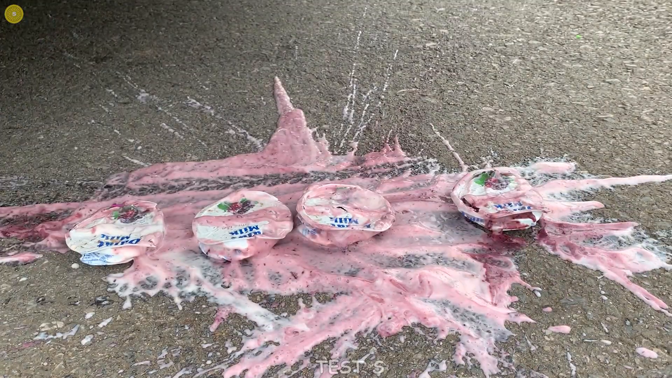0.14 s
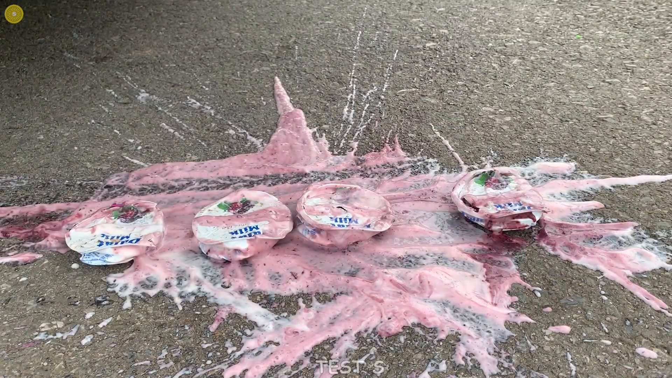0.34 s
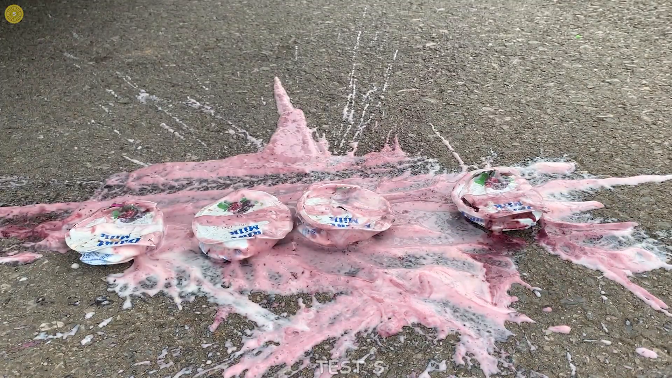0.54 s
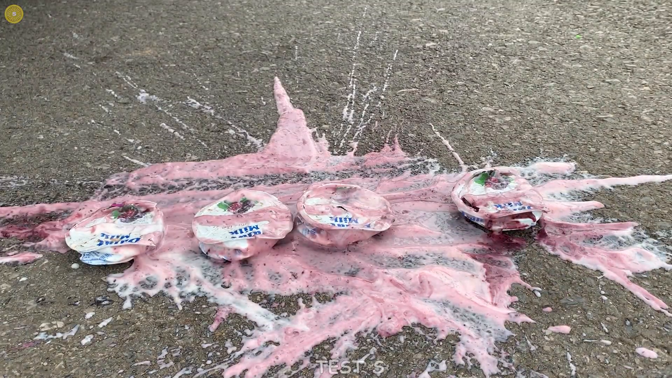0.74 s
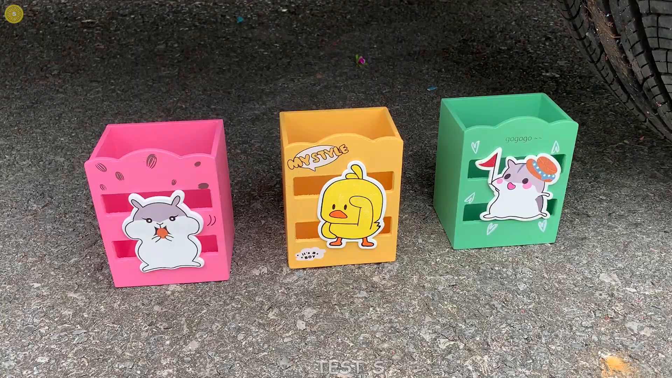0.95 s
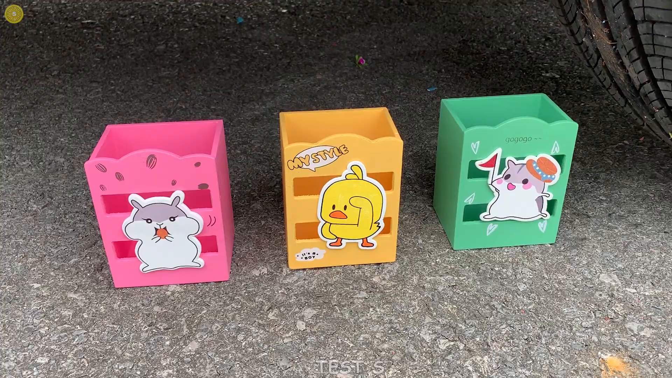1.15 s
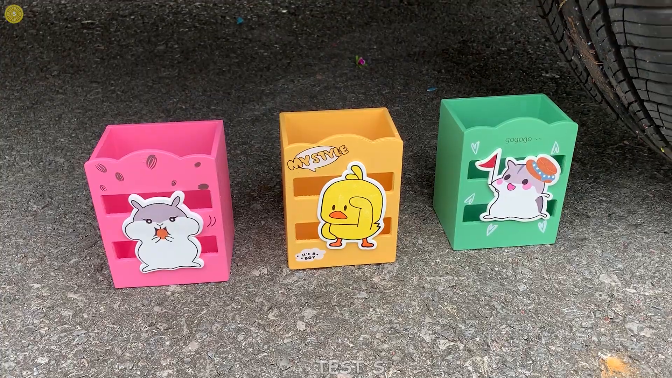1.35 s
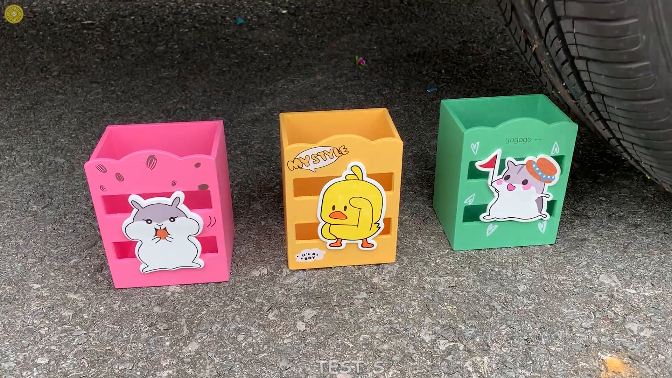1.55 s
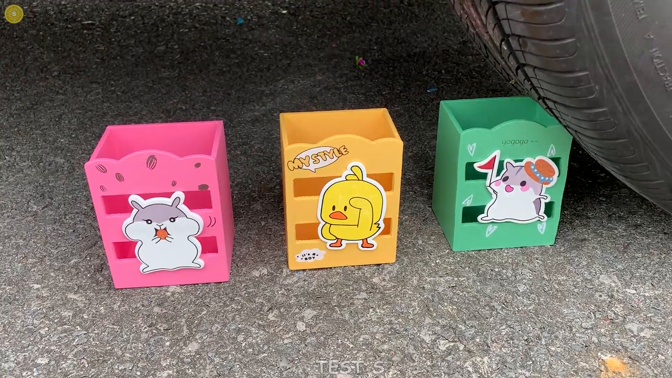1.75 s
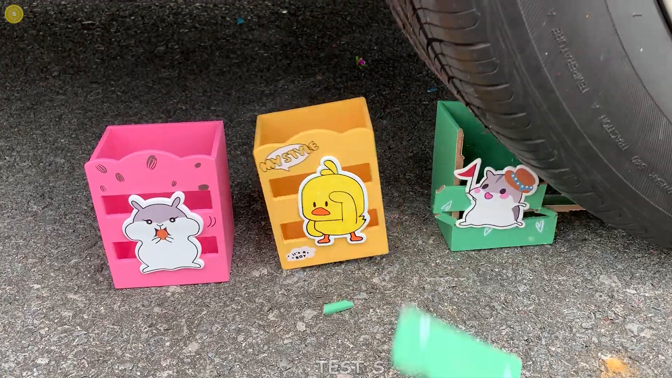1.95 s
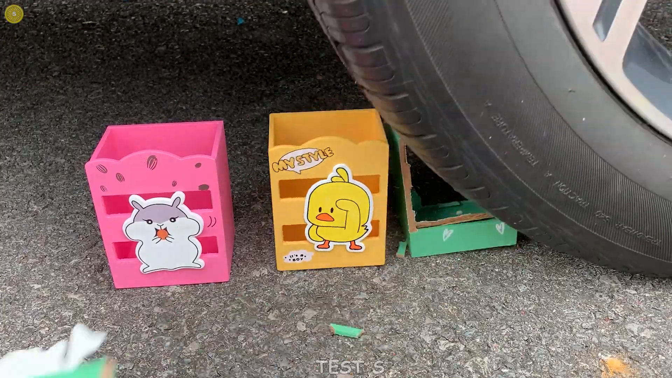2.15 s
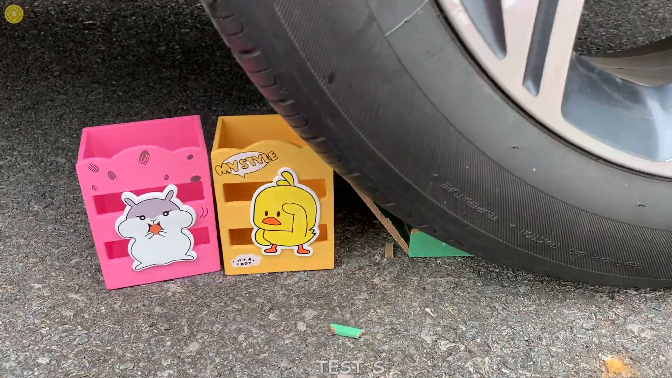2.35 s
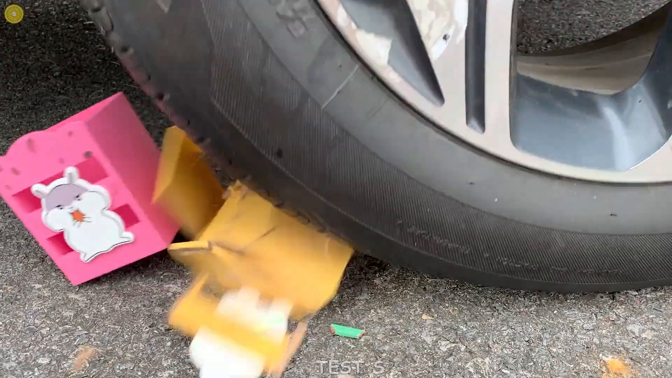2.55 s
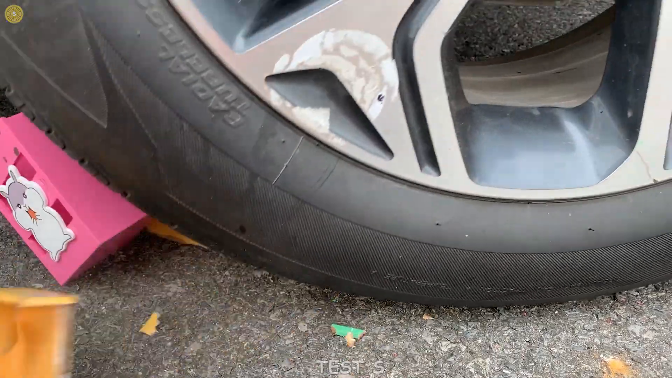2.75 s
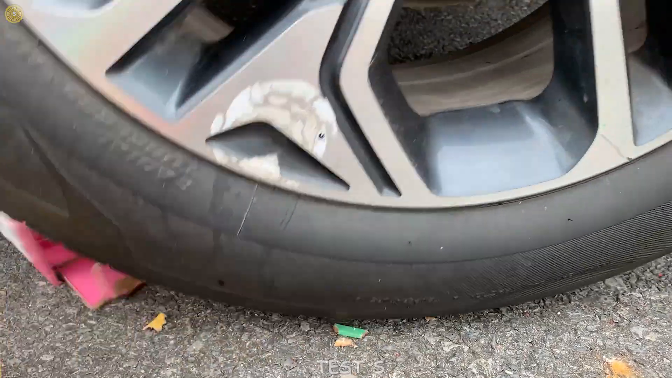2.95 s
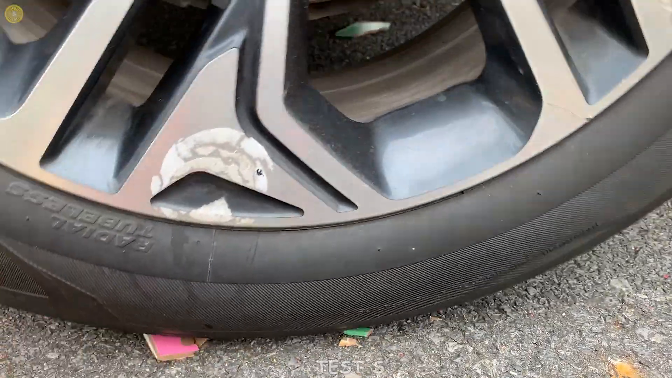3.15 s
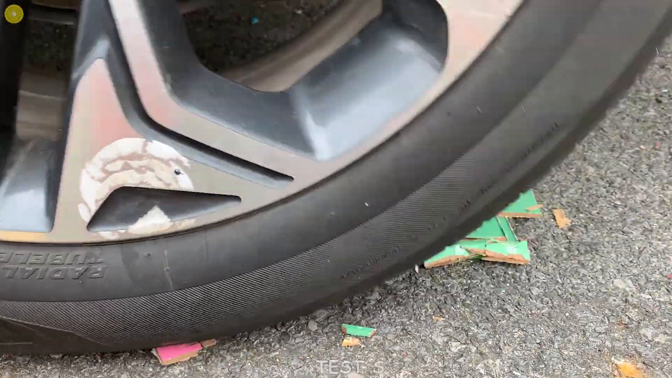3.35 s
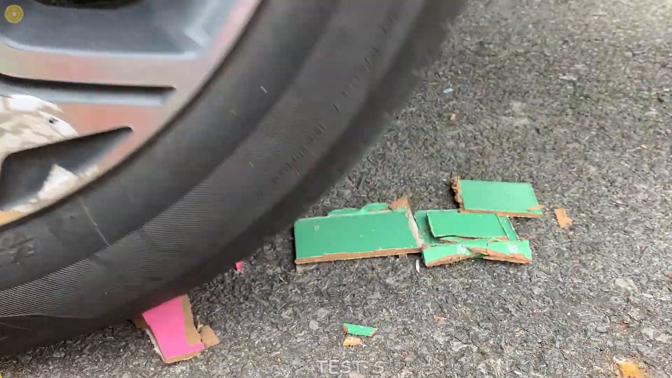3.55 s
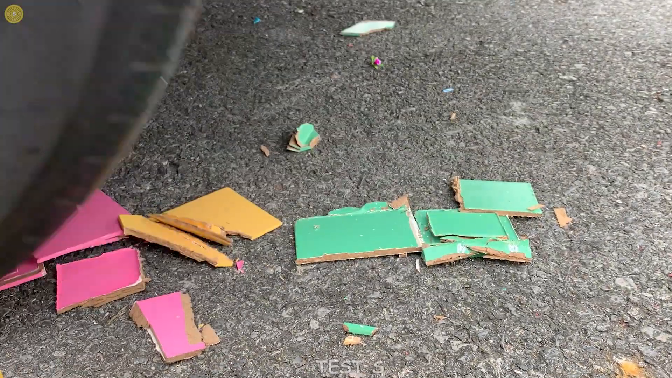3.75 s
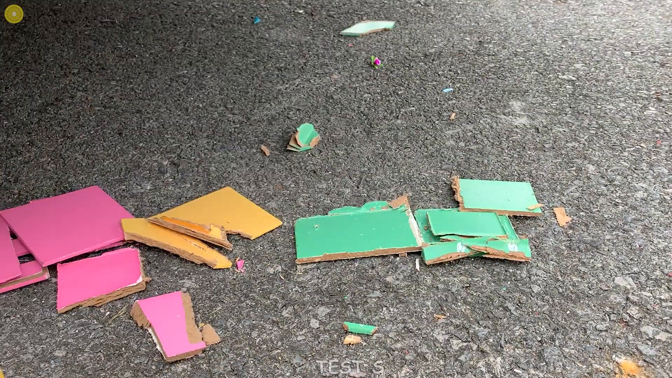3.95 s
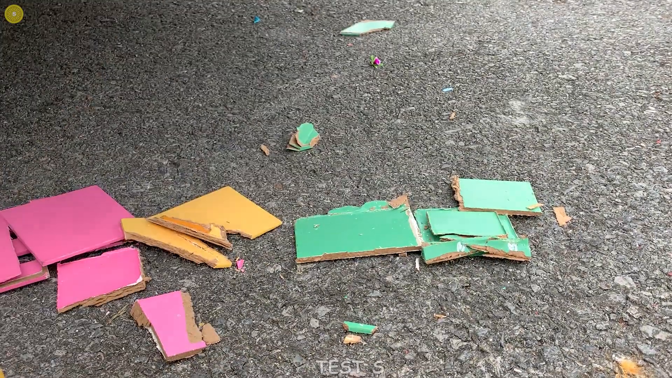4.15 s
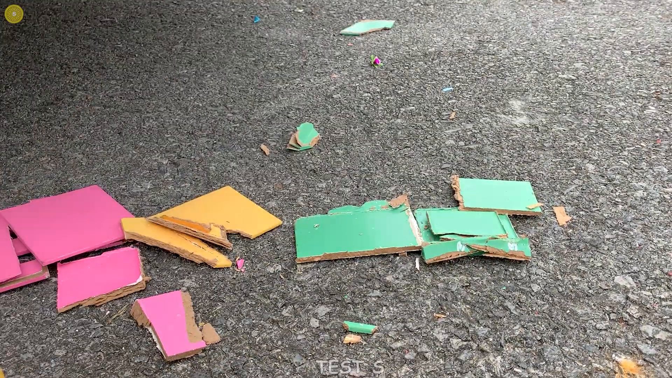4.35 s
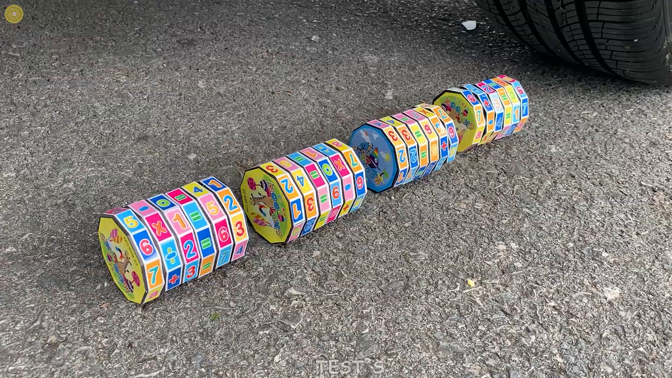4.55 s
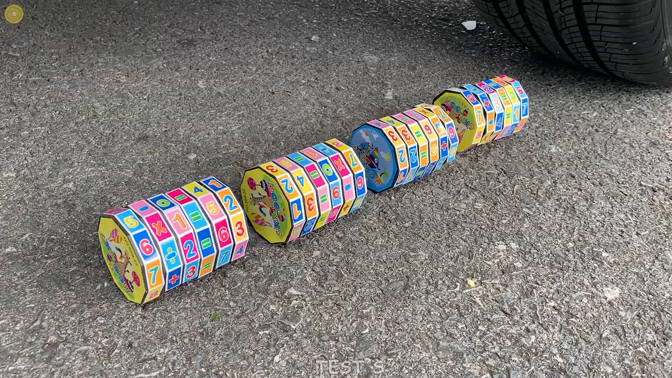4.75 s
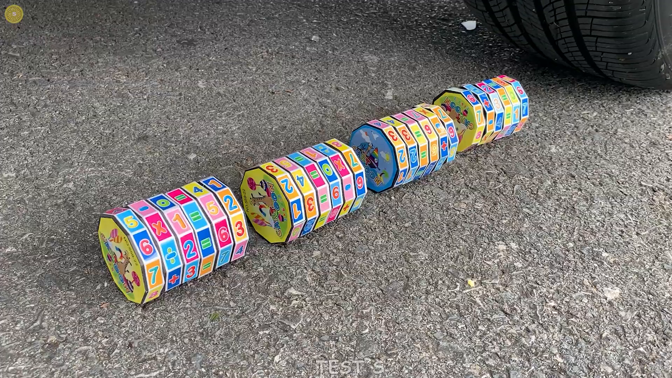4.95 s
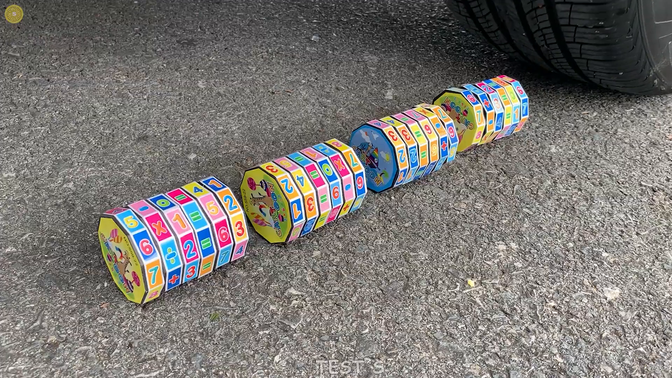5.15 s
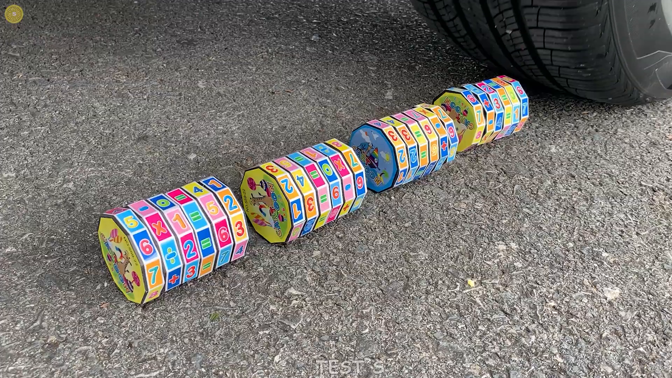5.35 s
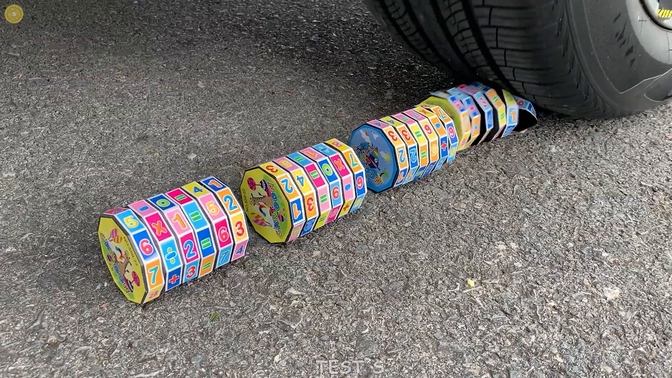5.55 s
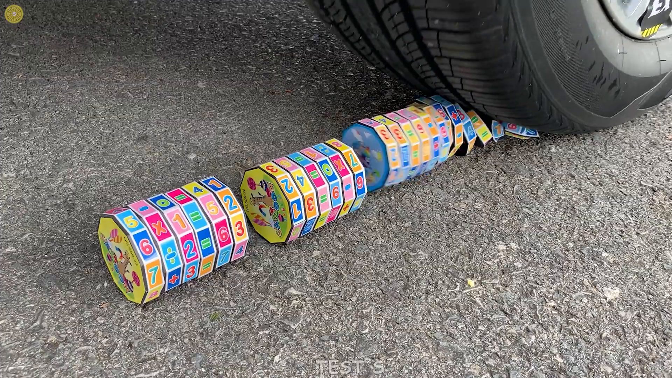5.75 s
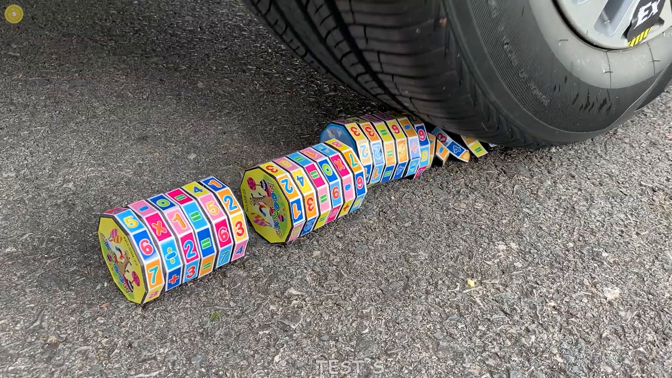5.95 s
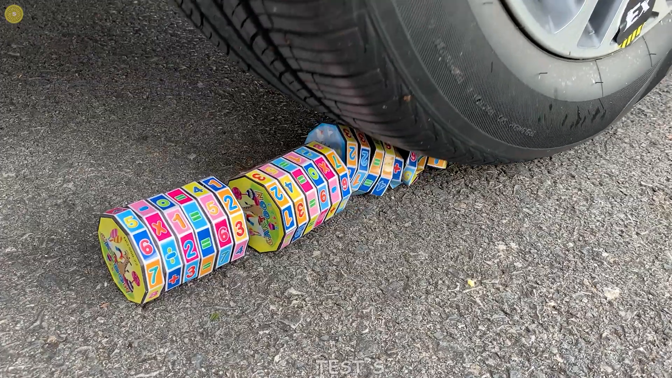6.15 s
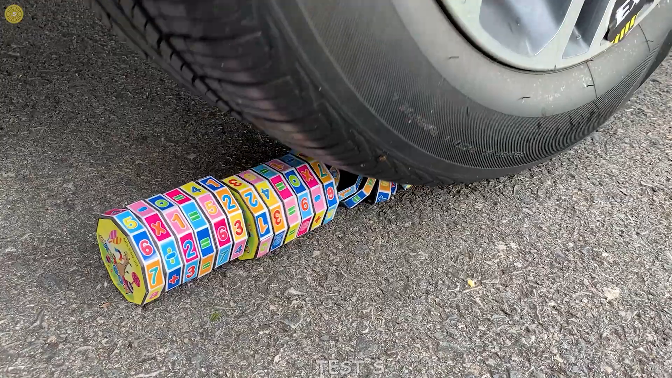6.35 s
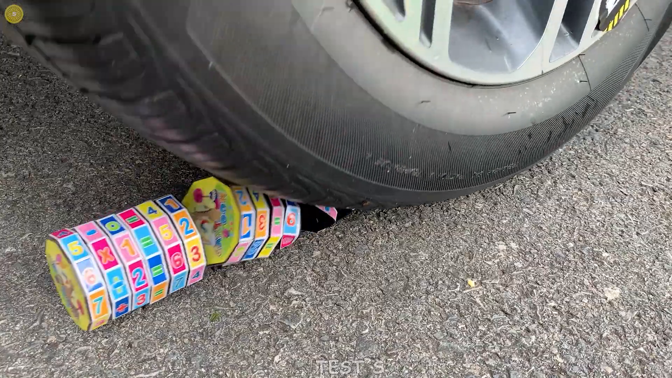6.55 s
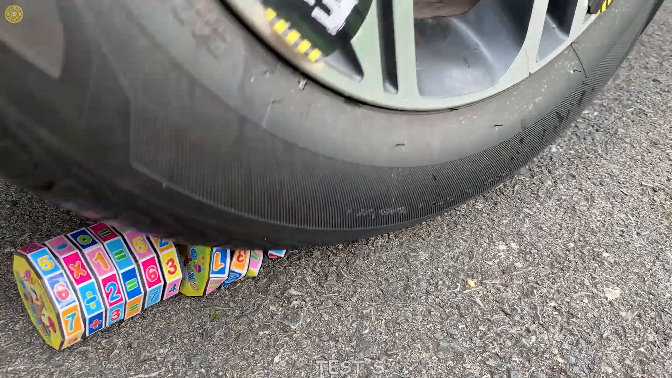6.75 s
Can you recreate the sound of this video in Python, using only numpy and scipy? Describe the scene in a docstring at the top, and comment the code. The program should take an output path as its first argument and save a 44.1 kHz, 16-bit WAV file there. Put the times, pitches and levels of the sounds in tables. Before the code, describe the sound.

Close to the road, a phone picks up a soft engine rumble with faint hiss and a thin whine. Brittle boxes burst under a slow wheel: overloaded bangs, low thumps, rattling shards and small pings. A quiet idling gap follows, then another slow roll crushes a row of small drums with many crisp cracks, crunches and lighter hollow knocks, continuing to the end.

```python
"""Tarmac: a car creeps over thin hollow boxes, then over a row of small hard plastic drums, near a phone.
Walls splinter (noise bursts through ringing modes), the tyre drops and booms (pitch sweep and decaying modes),
crumbs crunch (filtered random ticks), stray shards ping (one mode each).
The engine, earlier at the left port, idles or pulls in gear (orders of the firing rate, noise, whine).
Four shots are joined by hard cuts; the loudest cracks overload the recorder."""
import sys
import numpy as np
from scipy import signal
from scipy.fft import rfft, irfft
from scipy.io import wavfile

SR = 44100
rng = np.random.default_rng(int(sys.argv[2]) if len(sys.argv) > 2 else 0)


def file_out(sig):
    """Save sig as 16-bit WAV at sys.argv[1]."""
    # one column per channel
    cols = np.atleast_2d(sig).T
    # limit, then scale
    lim = np.clip(cols, -1, 1)
    pcm = np.round(lim * 32767).astype(np.int16)
    wavfile.write(sys.argv[1], SR, pcm)


N = 304290
T = np.arange(N) / SR
HZ = np.maximum(np.fft.rfftfreq(N, 1 / SR), 1)
ENGINE_LEAD_SAMPLES = 19  # left port ahead of right

# shot starts: t/s
CUTS_S = [0, .8475, 3.30393, 4.5515]
# spectrum of splintering plastic: f/Hz, level/dB
SPLINTER_SPECTRUM = [(760, -32), (1300, -4), (1490, -9), (2040, -0.5), (2410, -10), (2880, 2), (3890, -2.5),
                     (5910, -3.5), (7140, -8), (9080, -10), (10400, -12), (11700, -18), (12700, -16),
                     (14100, -24.5), (15800, -17)]
# tyre carcass modes: f/Hz, level/dB, t60/s
TYRE_MODES = [(66.6, -7, 0.091), (84.7, 4.5, 0.15), (119, 0.5, 0.21), (151.2, 3.5, 0.12),
              (161, -7.5, 0.078), (240.6, -22, 0.079), (350, -15.5, 0.066)]


def undb(db):
    """Amplitude ratio from dB."""
    return 10 ** (np.asarray(db) / 20)


def unit(x):
    """RMS of 1."""
    return x / np.sqrt(np.mean(x ** 2))


def top(x):
    """Peak of 1."""
    return x / np.abs(x).max()


def shape(points, hz):
    """Gain of a (f/Hz, level/dB) spectrum, straight over log frequency."""
    f, db = np.transpose(points)
    return undb(np.interp(np.log(hz), np.log(f), db))


def colour(x, points):
    """Causal minimum-phase filter with the given spectrum, by folding the cepstrum of its log gain."""
    hz = np.maximum(np.fft.rfftfreq(1024, 1 / SR), 1)
    cepstrum = irfft(np.log(shape(points, hz)))
    cepstrum[1:512] *= 2
    cepstrum[513:] = 0
    impulse_response = irfft(np.exp(rfft(cepstrum)))
    return signal.fftconvolve(x, impulse_response)[:len(x)]


def ring(x, hz, t60_s):
    """One decaying mode driven by x; a unit impulse rings with amplitude 1."""
    pole = np.exp(2j * np.pi * hz / SR - np.log(1000) / (t60_s * SR))
    return signal.lfilter([1], [1, -pole], x).imag


def band(x, lo_hz, hi_hz):
    """Butterworth band-pass."""
    return signal.sosfilt(signal.butter(2, [lo_hz, hi_hz], "band", fs=SR, output="sos"), x)


def walk(rate_hz):
    """Random levels joined by straight lines, rate_hz of them a second; spread near 1."""
    count = int(N / SR * rate_hz) + 2
    return 1.2 * np.interp(T * rate_hz, np.arange(count), rng.standard_normal(count))


def ports(pair, lead_rad):
    """Turns left ahead of right by lead_rad at each frequency."""
    return irfft(rfft(pair) * np.exp(.5j * lead_rad * np.array([[1], [-1]])), N)


def diffuse(points, corner_hz):
    """Engine noise, alike at both ports well below the corner, unrelated well above; left leads."""
    mid, side = rfft(rng.standard_normal((2, N))) * shape(points, HZ)
    side = side / np.sqrt(1 + (corner_hz / HZ) ** 2)
    left, right = unit(irfft(mid + side * np.array([[1], [-1]]), N))
    return np.array([np.roll(left, -ENGINE_LEAD_SAMPLES), right])


def rotation(track, jitter, rate_hz):
    """Phase in radians along a (t/s, f/Hz) track whose pitch wanders by the jitter fraction; left leads."""
    hz = np.interp(T, *np.transpose(track)) * (1 + jitter * walk(rate_hz))
    phase = 2 * np.pi * np.cumsum(hz) / SR
    return np.array([np.roll(phase, -ENGINE_LEAD_SAMPLES), phase])


def engine():
    """Orders of the firing rate, uneven in gear, over rumble, hiss gated by the firing and a thin whine."""
    # shots: in gear 0-1, orders level/dB, rumble level/dB, fan and valve hiss level/dB, whine level/dB
    shots = [(0, -30.5, -35.5, -48, -45.5), (1, -38, -45.5, -50, -58), (0, -39, -46.5, -56, -53.5),
             (1, -38, -44, -51, -61)]
    # nominal firing rate, one track a shot: t/s, f/Hz
    firing = [
        [(0.0, 31.91), (0.676, 32.62), (0.84, 32.84)],
        [(0.86, 25.32), (0.948, 25.2), (1.054, 27.1), (1.154, 27.5), (1.278, 26.1), (1.38, 25.8), (1.75, 24.7)],
        [(3.4, 31.1), (3.682, 31.53), (3.986, 32.18), (4.3, 32.94), (4.54, 32.97)],
        [(4.56, 27.32), (4.738, 27.18), (4.834, 26.2), (4.938, 25.9), (5.032, 25.15), (5.152, 24.72),
         (5.446, 25), (5.6, 24.8)],
    ]
    # nominal whine pitch, one track a shot: t/s, f/Hz
    whine = [
        [(0, 649), (.84, 638)],
        [(.86, 650), (1.75, 636)],
        [(3.4, 623), (4.1, 643.5), (4.54, 651)],
        [(4.56, 640), (5.5, 637)],
    ]
    # orders at idle: multiple of firing rate, level/dB
    idle_orders = [(1, 4), (2, 1.5), (3, 2.5), (4, -17), (5, -6), (6, -13.5), (7, -16), (8, -10.5),
                   (9, -17), (10, -17.5), (11, -16.5), (12, -24), (13, -22.5), (14, -23), (16, -37)]
    # orders in gear: multiple of firing rate, level/dB
    gear_orders = [(1, -17), (2, 0), (3, -2.5), (4, -5), (5, -27), (6, -11), (7, -5.5), (8, -17.5),
                   (9, -19), (10, -17), (11, -34.5), (12, -22), (13, -28.5), (14, -29), (15, -27.5),
                   (16, -26.5)]
    # rumble spectrum: f/Hz, level/dB
    rumble_spectrum = [(15, -37.5), (25, -7), (70, -1), (136, -5.5), (178, -7), (230, -13.5), (315, -15.5),
                       (355, -20.5), (517, -20), (628, -27), (900, -25.5), (1170, -59), (1980, -120)]
    # hiss spectrum ahead of the bay resonances: f/Hz, level/dB
    hiss_spectrum = [(290, -32.5), (500, -4), (1330, -5), (1960, -11), (2460, -10), (2650, -12.5),
                     (3480, -14), (4640, -18), (7670, -27.5), (8720, -22), (10700, -31), (11500, -53),
                     (12300, -43.5), (13200, -30.5), (15500, -67)]
    # engine bay resonances added to the hiss: f/Hz, width/Hz, level/dB
    bay = [(640, 82, -2), (1913, 180, -2), (2180, 200, -3.5), (2627, 48, 4), (4430, 170, -4.5)]

    out = np.zeros((2, N))
    edges = [int(s * SR) for s in CUTS_S] + [N]
    hiss = diffuse(hiss_spectrum, corner_hz=2500)
    resonances = sum(undb(db) * band(hiss, hz - width / 2, hz + width / 2) for hz, width, db in bay)
    hiss = (hiss + resonances) * undb(0.59 * walk(11))
    rumble = diffuse(rumble_spectrum, corner_hz=900) * undb(1.7 * walk(6))
    for shot, (gear, hum_db, rumble_db, hiss_db, whine_db) in enumerate(shots):
        part = slice(edges[shot], edges[shot + 1])
        turn = rotation(firing[shot], jitter=.004, rate_hz=13)[:, part]
        swing = rotation(whine[shot], jitter=.0057, rate_hz=30)[:, part]
        waver_db = 1 + 1.5 * gear
        orders = gear_orders if gear else idle_orders
        hum = sum(undb(db + waver_db * walk(7)[part]) * np.sin(k * turn + 2 * np.pi * rng.random())
                  for k, db in orders)
        out[:, part] = undb(hum_db) * unit(hum) + undb(rumble_db) * rumble[:, part]
        out[:, part] += undb(hiss_db) * hiss[:, part] * (1 + 0.16 * np.cos(turn))
        out[:, part] += undb(whine_db + 1.2 * walk(14)[part]) * np.sin(swing)
    return out


def grains(rate_hz, spread_db):
    """Random ticks, mostly small, each a noise burst with a 2 ms decay."""
    ticks = (rng.random(N) < rate_hz / SR) * undb(spread_db * rng.exponential(size=N))
    envelope = signal.lfilter([1], [1, -np.exp(-1 / (.002 * SR))], ticks)
    return envelope * rng.standard_normal((2, N))


def debris():
    """Crumbs crackle in patches, loose walls rattle, the carcass rumbles as the tyre rolls over the pieces."""
    # rolling over debris of boxes, then of drums: t/s, grinding level/dB, tyre rumble level/dB
    roll = [
        [(1.66, -58, -47), (1.886, -44, -40), (2.0, -40, -39), (2.09, -32, -21), (2.2, -35.5, -38),
         (2.36, -45.5, -40), (2.46, -46, -43), (2.6, -15.5, -13), (2.67, -40, -29.5), (2.75, -30.5, -32),
         (2.95, -35.5, -24.5), (3.07, -36.5, -24.5), (3.25, -47, -30), (3.41, -53.5, -40.5), (3.6, -61.5, -48)],
        [(5.45, -59.5, -46), (5.728, -45, -37.5), (5.81, -33, -31.5), (5.92, -31.5, -27), (6.06, -36, -28),
         (6.22, -41, -33.5), (6.3, -35.5, -26), (6.48, -40.5, -29.5), (6.68, -33.5, -28), (6.78, -39, -27.5),
         (6.9, -37, -28)],
    ]
    # loose wall pieces: f/Hz, half-width/Hz, level/dB
    walls = [(720, 210, 1), (900, 30, -4), (1250, 41, -5), (1620, 230, -3.5), (2370, 140, -3)]
    rattle_db = -5  # re crumbs

    crumbs = 0
    for lo_hz, hi_hz in ((1300, 2860), (3200, 7500), (7000, 16000)):  # large, middle and fine, each on its own
        shared = grains(450, spread_db=4)[0]
        pair = grains(450, spread_db=4)
        crumbs = crumbs + undb(4.5 * walk(25)) * band(shared + 1.4 * pair, lo_hz, hi_hz)
    crumbs = unit(np.array([colour(port, SPLINTER_SPECTRUM) for port in crumbs]))

    knocks = grains(450, spread_db=2.5)
    knocks = knocks[0] + 0.47 * knocks[::-1]
    rattle = unit(sum(undb(db + 4.7 * walk(25)) * unit(band(knocks, hz - half_width, hz + half_width))
                      for hz, half_width, db in walls))

    push = rng.standard_normal(N) + 0.11 * rng.standard_normal((2, N))
    rumble = unit(sum(undb(db) * ring(push, hz, t60_s) / np.sqrt(t60_s) for hz, db, t60_s in TYRE_MODES))

    out = 0
    for span in roll:
        s, *levels = np.transpose(span)
        grind, tyre = (undb(np.interp(T, s, db, left=-120, right=-120)) for db in levels)
        out = out + grind * (crumbs + undb(rattle_db) * rattle) + tyre * rumble
    return out


def cracks():
    """Each crack is a burst of tiny fractures, heard directly and through the ringing wall and shards."""
    # cracks: t/s, snap level/dB, shards re snap/dB, wall re snap/dB, wall f/Hz, t60/s, left re right/dB
    crack_events = [(1.701, -24, -6, -22.5, 590, 0.011, 1), (1.737, -29, -8, -20.5, 623, .013, 1),
                    (1.7568, -9.5, -7.5, -26, 1380, 0.015, -0.5), (1.817, -3, -1, -11, 1260, .05, -1),
                    (1.827, -4, 2, -5.5, 1205, .04, -1.5), (1.8346, 21.5, -2, 4, 1250, 0.012, -7),
                    (1.8447, 1.5, 4, 0, 1110, .012, 4), (1.8608, 14.5, -4.5, -11, 533, 0.021, 0.5),
                    (1.8709, -14.5, -14, 3, 1203, .01, 4), (1.9174, -19.5, -8, 0, 1250, 0.0075, 0),
                    (1.951, -26, -4, -18, 605, 0.016, -1), (2.0036, -2.5, -29, -4, 1330, 0.019, -2),
                    (2.0086, 11.5, -25, -3.5, 950, 0.0069, -6), (2.0121, 13, 2, -17, 950, .012, 0.5),
                    (2.0231, 1, -19, -11, 1240, 0.013, 6), (2.078, -8, -17, -25.5, 594, .015, -1),
                    (2.0861, -4, -6, -18.5, 550, 0.027, 2), (2.1085, -26.5, 1.5, 1, 936, .03, -1),
                    (2.145, -24, -13, 9.5, 814, 0.014, 3), (2.2009, -6.5, -1.5, -20, 985, 0.014, 1),
                    (2.2103, 3.5, -1.5, -6.5, 1250, 0.025, 0), (2.2302, -17, -11, -18, 1285, 0.013, 12),
                    (2.2543, -26, -5, -14, 1290, .01, 7), (2.2659, -8.5, -3.5, -0.5, 1310, 0.027, -5.5),
                    (2.3079, -25.5, 2, 1, 1324, .012, 1), (2.3242, -22.5, 2, -2, 720, 0.016, 1),
                    (2.383, -14.5, -13, -35, 833, 0.02, 1), (2.391, -11.5, -12, -39.5, 525, 0.014, -1),
                    (2.407, -17, -12, -22, 1280, .01, 4), (2.4703, -8, -11, -20.5, 940, 0.012, 0),
                    (2.4886, 7.5, -3, -1, 900, 0.0053, -2), (2.4993, 15.5, 3, -4, 855, 0.016, 2),
                    (2.5368, 5, -6, -1, 667, 0.014, -2), (2.5423, 18, 0, -2.5, 950, 0.02, -3.5),
                    (2.5549, -8, -23, 11, 1000, 0.011, 17), (2.577, 16, -28, -1.5, 1067, 0.014, -5),
                    (2.5831, -7.5, 2, 0, 574, 0.029, -2), (2.609, -9, -1.5, -10, 1300, .011, 16),
                    (2.6328, 3, -8, -36, 864, 0.028, -1), (2.6416, -9, -4, -16, 550, 0.016, 0),
                    (2.6938, -1, -1, -30.5, 863, 0.028, 1), (2.7217, -18, -4, -14, 624, .012, -8),
                    (2.7297, -14.5, -10, -10.5, 875, 0.071, 7), (2.7749, -16.5, -26, -20.5, 527, 0.011, 0),
                    (2.805, -9.5, -15, -10.5, 640, 0.032, 0), (2.824, 0.5, -0.5, 7, 603, 0.017, -2.5),
                    (2.8718, -12, -24, -35.5, 580, .02, 1), (2.9442, -9.5, -2, 0, 885, 0.061, -8),
                    (2.9622, 8, -41, -1.5, 1360, 0.022, 7.5), (2.975, 3, 1.5, -11.5, 614, 0.0045, -5.5),
                    (2.9884, -17, 4, -12.5, 1230, 0.025, 14), (3.014, -14.5, -13, 0, 1290, 0.022, 2),
                    (3.092, 4, -1.5, 5.5, 657, .02, -6.5), (3.1091, -12, -3, 9, 900, 0.012, -2),
                    (3.1367, -17, -3.5, -2, 640, 0.038, 0), (3.191, -27.5, -1, -11, 527, .012, -5),
                    (3.1983, -27.5, -1.5, -12.5, 522, .012, -3), (3.268, -27.5, -11, -12, 591, 0.011, 0),
                    (3.314, -20.5, -1, -17, 617, 0.0092, 1), (3.3558, -27.5, -1.5, -24, 623, 0.0073, 2),
                    (3.655, -39, -14, -4.5, 648, 0.013, 5), (3.7734, -43.5, -15, -4, 640, 0.012, -3),
                    (3.8447, -43, 5.5, -4.5, 528, 0.0097, -2), (3.86, -42, -17, -10, 640, 0.014, -2),
                    (5.5255, -29.5, 5.5, -3, 1200, 0.026, -4), (5.5543, -36, 7, 7, 575, 0.014, -4),
                    (5.6187, -18, 2.5, -9, 576, 0.0095, -2.5), (5.706, -5.5, 2, -48, 1692, 0.013, -2),
                    (5.76, 0, -3, -21.5, 1320, 0.0091, 0), (5.7655, 9, -0.5, -7, 1563, 0.011, -4.5),
                    (5.7771, -10.5, -16, -2, 590, 0.0126, 0), (5.8286, -20.5, 1.5, -2.5, 667, 0.01, -2),
                    (5.853, 3.5, -2, -15.5, 927, .018, -9), (5.859, 2.5, 0.5, 1.5, 856, 0.018, 0),
                    (5.906, 5, -3, -8, 1585, 0.02, -2.5), (5.9265, -19, -7, 2, 866, 0.013, 1),
                    (5.9463, -21, -2, 1.5, 750, 0.015, -3), (5.9677, 4.5, -3, -17.5, 870, 0.024, -2.5),
                    (6.0062, -7, 2.5, -12.5, 1120, 0.011, 0), (6.0152, -1, -36, -16.5, 1113, 0.0069, -2.5),
                    (6.0386, 4, -5, -23.5, 730, .018, -0.5), (6.0711, -7.5, -8, -15, 567, 0.021, 0),
                    (6.1052, 4, -17.5, -21, 751, 0.022, -2), (6.1578, -2.5, 1, -40, 1664, 0.023, -1),
                    (6.2403, 4, -7.5, -19, 763, 0.0095, 2), (6.2516, 12, -7, -22.5, 571, 0.012, -2.5),
                    (6.2764, 3.5, 0, -18, 1660, 0.028, -2.5), (6.3041, 4, -9, -24, 845, 0.036, 0),
                    (6.32, -5.5, 1, -2, 770, 0.022, -2.5), (6.3807, 7.5, -31, -14.5, 736, 0.011, 0),
                    (6.4188, 6, 0, -10.5, 1023, 0.013, 1), (6.5013, -16.5, -3, -6.5, 1027, .02, 3),
                    (6.522, 7.5, -1.5, -17, 1180, 0.013, 3), (6.5702, -18, 4, -13, 680, 0.014, 0),
                    (6.5891, 8, -47, -11, 776, 0.0073, -1.5), (6.6074, -4.5, -1, -22.5, 711, 0.018, 6),
                    (6.6644, 2, -3.5, -11.5, 744, 0.011, -1), (6.6744, 0.5, -30, -8, 780, 0.0073, 2),
                    (6.6915, 1.5, -1, -9, 525, 0.026, -11), (6.6984, 0.5, -24, -8, 500, 0.025, 12),
                    (6.7101, -1, 0, -16.5, 1660, 0.0098, -2), (6.7236, -3, -1.5, -6, 803, 0.015, -0.5),
                    (6.8012, 5.5, -8, -19, 780, 0.0081, -1), (6.8166, 8, -4.5, -11.5, 512, .01, 0),
                    (6.876, -3.5, -14, -19, 850, 0.012, 3), (6.8883, 7, -31, -33.5, 530, .014, -2.5)]
    # box shard modes ahead of random scatter: f/Hz, level/dB
    box_shards = [(1750, 0.5), (2150, 0.7), (2500, 6.7), (2950, -8), (3900, -8.5), (5500, 5)]
    # drum shard modes ahead of random scatter: f/Hz, level/dB
    drum_shards = [(1750, -5), (2400, 2.5), (3500, -4), (4300, 3), (4900, 8.5), (5600, -6.5)]
    tail_db, tail_db_per_db = -16.5, -0.57  # settling after the snap, weaker beside a louder snap
    shard_ring_db, wall_ring_db, mode_scatter_db = -5, -1.5, 4

    size = 4096
    out = np.zeros((2, N + SR))
    t = np.arange(size) / SR
    impulse = 1. * (t == 0)
    splinter = colour(impulse, SPLINTER_SPECTRUM)
    snap_path, shard_path, wall_path = rfft([band(splinter, 6600, 17000), band(splinter, 1300, 6000),
                                             band(impulse, 260, 1600)])
    for s, snap_db, shards_db, wall_db, wall_hz, t60_s, pan_db in crack_events:
        shared, left, right = rng.standard_normal((3, size))
        own = np.array([left, right])
        tail = undb(tail_db + tail_db_per_db * snap_db) * 1000 ** (-t / 0.074)
        fall = 1000 ** (-t / np.clip(t60_s, .003, .15)) + tail
        fall *= np.minimum(t / 0.0018, 1) ** 2
        fall *= undb(3.45 * np.repeat(rng.standard_normal(size // 32), 32))  # a new random level every 32 samples

        snap = top(irfft(rfft((shared + 0.33 * own) * fall) * snap_path))
        burst = (shared + .5 * own) * fall
        mid, low = (top(irfft(rfft(burst) * path)) for path in (shard_path, wall_path))
        modes = box_shards if s < CUTS_S[3] else drum_shards
        scatter_db = mode_scatter_db * rng.standard_normal(len(modes))
        rung = sum(undb(db + extra_db) * ring(burst, hz, .009)
                   for (hz, db), extra_db in zip(modes, scatter_db))
        shards = mid + undb(shard_ring_db) * top(rung)
        wall = low + undb(wall_ring_db) * top(ring(burst, wall_hz, 0.014))

        sound = snap + undb(shards_db) * top(shards) + undb(wall_db) * top(wall)
        start = int(s * SR)
        out[:, start:start + size] += undb(snap_db + np.array([[.5], [-.5]]) * pan_db) * sound
    return out[:, :N]


def drops():
    """As a wall gives way a blow runs round the tyre, highs first; carcass and the air inside ring on."""
    # tyre drops: t/s, blow level/dB, air ring re blow/dB, first f/Hz
    drop_events = [(1.837, 2, -27.5, 686), (1.863, 0, -39, 486), (1.901, -5, -42, 300),
                   (2.011, 7, -27, 900), (2.049, -5, -44, 197), (2.196, -14, -22, 406), (2.5, 0, -27, 466),
                   (2.541, 10, -48, 688), (2.582, 4.5, -56, 600), (2.617, -4.5, -57, 196),
                   (2.823, 8, -27.5, 900), (2.963, 1, -33, 680), (3, -2.5, -35, 284),
                   (3.093, 10, -23.5, 1009), (3.134, 1.5, -28, 203), (5.764, -17, -8.5, 570),
                   (5.856, -24, -18, 603), (5.907, -13, -25, 570), (6.253, -16.5, -5, 406),
                   (6.320, -8, -16.5, 480), (6.382, -11, -41, 638), (6.419, -28, -40, 497),
                   (6.521, -21, -43, 497), (6.591, -36, -24, 800), (6.692, -7.5, -34, 680),
                   (6.816, -12.5, -16, 599)]
    # pitch at which a blow ends, on boxes and on drums: f/Hz
    settle_hz = (110, 139)
    air_hz, air_t60_s = 199, 1.1
    carcass_db = -15  # re blow

    out = np.zeros(N + SR)
    t = np.arange(SR, dtype=np.float32) / SR
    for s, blow_db, air_db, first_hz in drop_events:
        last_hz = settle_hz[s > CUTS_S[3]]
        pitch_hz = last_hz + (first_hz - last_hz) * np.exp(-t / 0.0045)
        blow = np.sin(2 * np.pi * np.cumsum(pitch_hz) / SR) * 1000 ** (-t / .062) * (1 - np.exp(-t / .002))

        chance = rng.standard_normal((len(TYRE_MODES), 2))  # scatter of level and pitch
        carcass = sum(undb(db + 3.5 * a) * np.sin(2 * np.pi * hz * (1 + 0.06 * b) * t) * 1000 ** (-t / t60_s)
                      for (hz, db, t60_s), (a, b) in zip(TYRE_MODES, chance))
        carcass = carcass * (1 - np.exp(-t / 0.0043))

        # every blow pushes the air ring in step
        swing = np.cos(2 * np.pi * air_hz * (t + s - CUTS_S[2]) - 1.3)
        air = swing * 1000 ** (-t / air_t60_s) * (1 - np.exp(-t / 0.0048))

        start = int(s * SR)
        out[start:start + SR] += undb(blow_db) * (blow + undb(carcass_db) * carcass + undb(air_db) * air)
    return band(band(out[:N], 55, 14000), 45, 15000)


def pings():
    """A loose shard skips on the tarmac: a short scratch rings one clear mode."""
    # pings: t/s, peak level/dB, f/Hz
    ping_events = [(2.125, -19, 1800), (3.139, -19, 2090), (3.148, -20, 2370), (3.191, -25, 2160),
                   (3.199, -20, 2240), (3.225, -27, 2130), (3.233, -33, 2580)]

    out = np.zeros(N)
    t = np.arange(2048) / SR
    for s, peak_db, hz in ping_events:
        scratch = rng.standard_normal(len(t)) * np.exp(-t / 0.0014)
        start = int(s * SR)
        out[start:start + len(t)] += undb(peak_db) * top(ring(scratch, hz, t60_s=0.023))
    return out


def scene():
    """Engine plus crushing sounds, with one phase lead between the ports for boxes and one for drums."""
    # left port ahead of right, boxes: f/Hz, lead/rad
    box_lead = [(0, 0), (1290, 0.6), (2330, 5.9), (3190, 8.6), (4570, 5.9), (5600, 10.2), (6120, 10.7),
                (7060, 9.3), (10200, 5.1), (11400, 3.3), (12600, 2.1), (13400, 0.3), (14500, -0.3),
                (15500, -2.4)]
    # left port ahead of right, drums: f/Hz, lead/rad
    drum_lead = [(0, 0), (780, 0.6), (1380, 0.4), (1720, -0.8), (3100, 2.2), (4310, 0.6), (5860, 4.3),
                 (6890, 3.1), (9730, -0.6), (11400, -2.9), (12500, -4.1), (13400, -6.0), (14600, -6.8),
                 (15500, -8.3)]
    skip_samples = 153

    boxes = T < CUTS_S[3]
    box_rad, drum_rad = (np.interp(HZ, *np.transpose(lead)) for lead in (box_lead, drum_lead))

    def heard(x):
        """Sound at the two ports."""
        return ports(x * boxes, box_rad) + ports(x * ~boxes, drum_rad)

    boom = heard(drops() * undb([[-.6], [.6]]))
    # the second cut skips a moment, so the ring jumps with a click
    boom = np.where((T >= CUTS_S[2]) & boxes, np.roll(boom, -skip_samples, axis=1), boom)
    crush = heard(debris() + cracks() + pings())
    return engine() * undb([[-.7], [.7]]) + crush + boom


def record(dry):
    """The microphone loses the deepest bass, the converter clips at full scale and the top is cut."""
    top_hz = 15940
    heard = signal.sosfilt(signal.butter(2, 28, "high", fs=SR, output="sos"), dry)
    clipped = np.clip(heard, -1, 1)
    return signal.sosfilt(signal.ellip(8, .2, 60, top_hz, fs=SR, output="sos"), clipped)


dry = scene()
out = record(dry)
file_out(out)
```